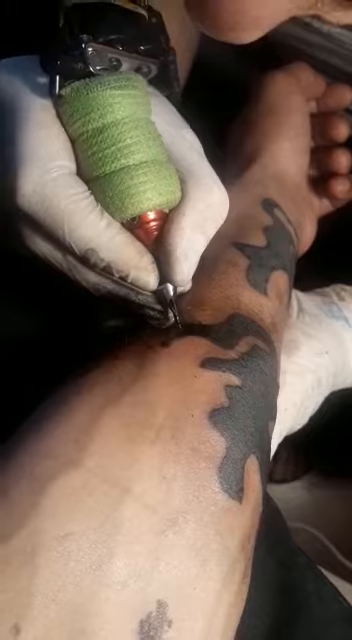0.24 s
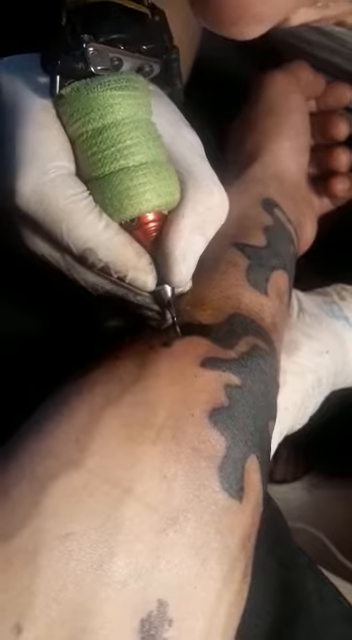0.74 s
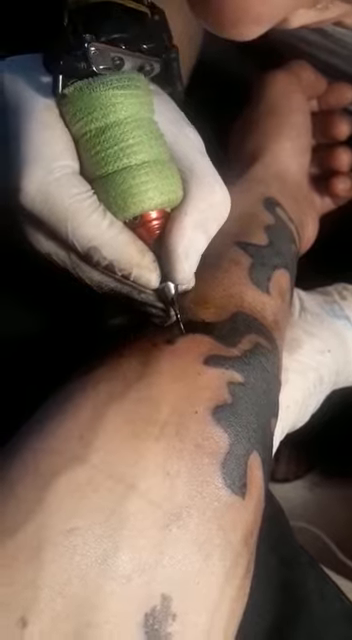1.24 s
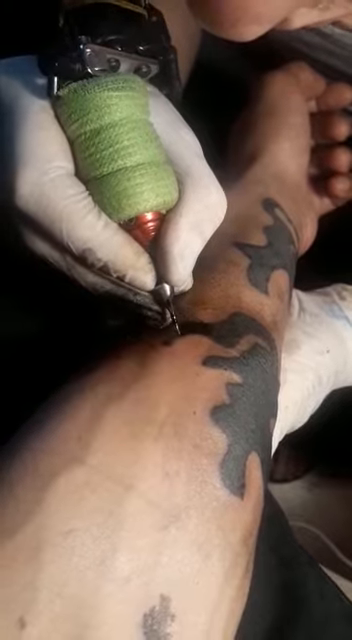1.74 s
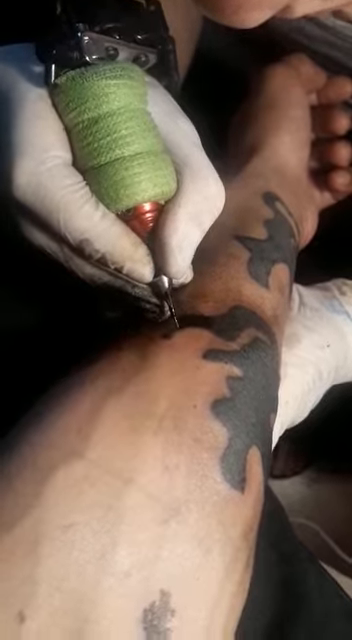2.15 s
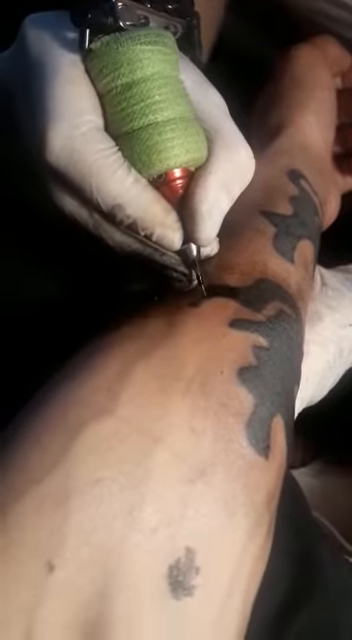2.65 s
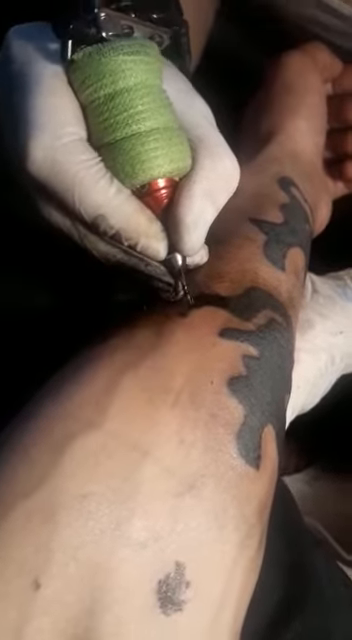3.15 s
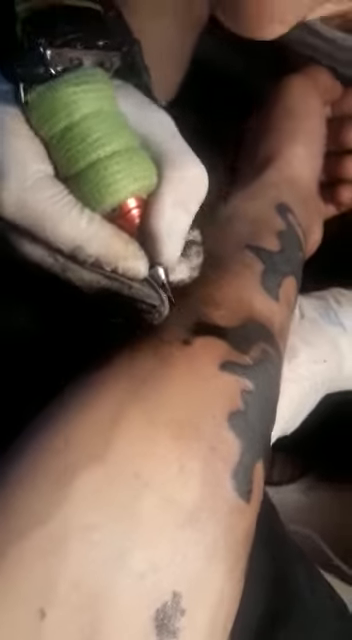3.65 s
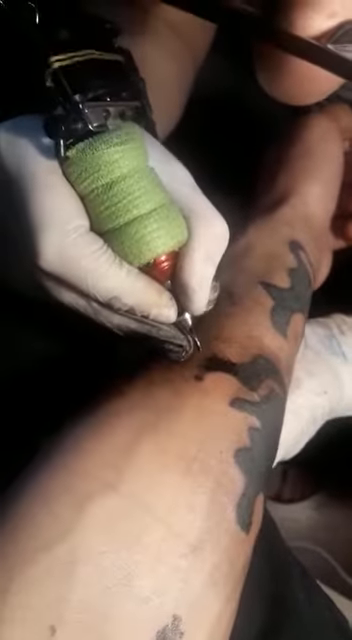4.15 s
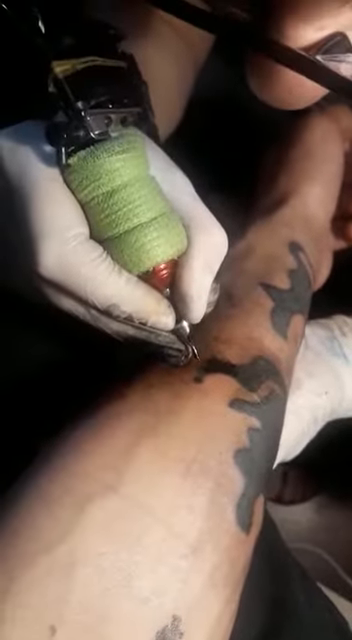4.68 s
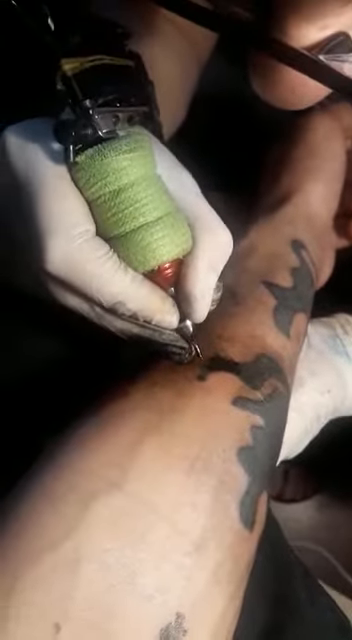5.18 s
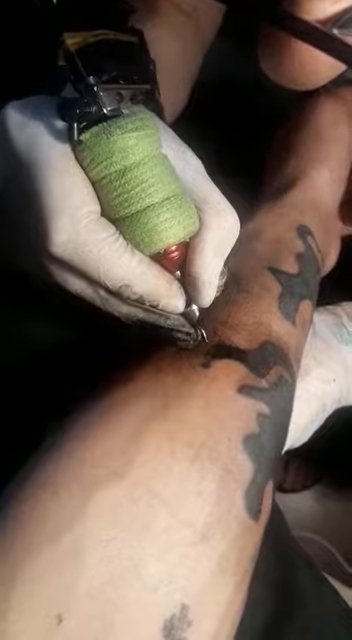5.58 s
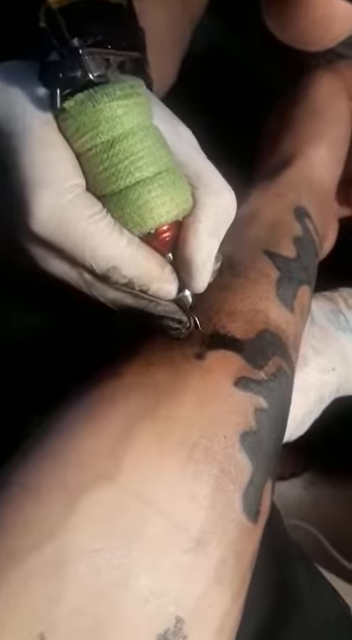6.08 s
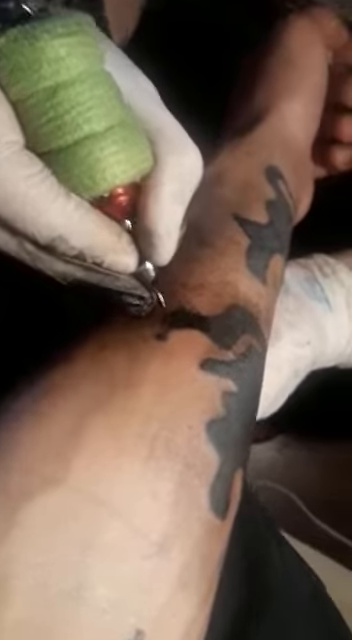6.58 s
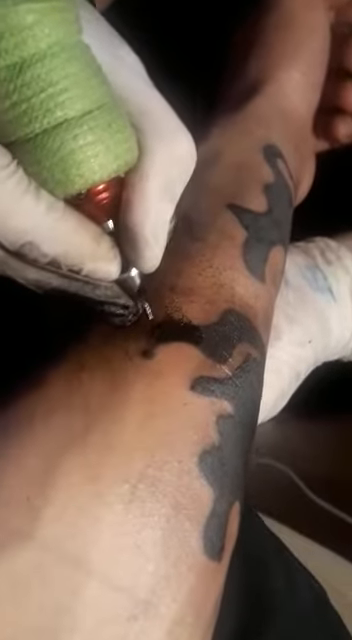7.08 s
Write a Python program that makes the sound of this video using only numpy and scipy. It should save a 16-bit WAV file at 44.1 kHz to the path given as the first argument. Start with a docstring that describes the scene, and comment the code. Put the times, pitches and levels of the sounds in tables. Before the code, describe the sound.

A tattoo machine blips, then buzzes hard and close in two long runs with a short pause between them.

```python
"""A close, hard buzz: a coil tattoo machine blips, then runs twice for about 3 s in a small room.
About 105 times a second the armature knocks the frame; tube, spring, needle bar and yoke ring
with it and the contact sizzles. The colour shifts with the hand's grip and position, and the
buzz rasps when skin drags on the needle. Two short pauses bare the room's tail, rumble and hum."""
import sys
import numpy as np
from scipy import signal
from scipy.fft import rfft, irfft
from scipy.io import wavfile
from scipy.ndimage import uniform_filter1d

SR = 44100
rng = np.random.default_rng(int(sys.argv[2]) if len(sys.argv) > 2 else 0)


def wav_record(signal):
    """Record a signal, one row per channel, as 16-bit PCM in the file named by sys.argv[1]."""
    frames = np.transpose(np.atleast_2d(signal))
    bounded = np.clip(frames, -1, 1)
    # unit amplitude maps onto the largest positive 16-bit level
    quanta = np.round(bounded * 32767).astype(np.int16)
    wavfile.write(sys.argv[1], SR, quanta)


N = 322812
T = np.arange(N) / SR


def gain_of(db):
    return 10 ** (np.asarray(db) / 20)


def rms(x):
    return np.sqrt(np.mean(x ** 2) + 1e-20)


def log_interp(points, hz):
    """Curve value at hz, on a log frequency axis."""
    point_hz, values = np.transpose(points)
    return np.interp(np.log(hz + 1), np.log(point_hz + 1), values)


def drift(top_hz):
    """Slow random wander, about unit RMS, in the decade below top_hz."""
    rates_hz = np.geomspace(top_hz / 10, top_hz, 18)
    wander = sum(np.sin(2 * np.pi * (hz * T[::100] + rng.random())) for hz in rates_hz)
    return wander.repeat(100)[:N] / 3


# Rumble spectrum: f/Hz, relative density/dB
RUMBLE_SPECTRUM = [(20, -36), (35, -10), (50, -4), (80, 2), (120, -0.5), (170, -4), (280, 2), (450, -4.5),
                   (750, -3), (1100, -9.5), (2000, -23), (2800, -28.5), (6000, -45.5), (12000, -46)]
def room_rumble(level_db=-47, swell_db=1.0):
    """Low room noise, swelling slightly."""
    shape = gain_of(log_interp(RUMBLE_SPECTRUM, np.fft.rfftfreq(N, 1 / SR)))
    noise = irfft(rfft(rng.standard_normal(N)) * shape, N)
    return gain_of(level_db + swell_db * drift(2.5)) * noise / rms(noise)


# Room hum tones: f/Hz, level/dB
HUM_TONES = [(78, -63), (152, -54.5), (199.5, -54.5)]
def room_hum(waver_db=0.4, waver_rad=0.72):
    """Low tones wavering in level and phase."""
    out = np.zeros(N)
    for hz, db in HUM_TONES:
        peak = np.sqrt(2) * gain_of(db + waver_db * drift(1.8))
        out += peak * np.sin(2 * np.pi * hz * T + waver_rad * drift(6.9))
    return out


# Soft bumps: a faint click as the armature pulls in or the switch is pressed before each run, and a handling
# knock near the end: t/s, f/Hz, level/dB, decay/s
SOFT_BUMPS = [(0.399, 2010, -51, 0.016), (4.21, 2390, -58, 0.019), (6.605, 348, -34.5, 0.0096)]
def soft_bumps():
    """Each bump is a soft puff of octave-wide noise."""
    out = np.zeros(N)
    for at_s, hz, db, decay_s in SOFT_BUMPS:
        octave = signal.butter(2, [hz / np.sqrt(2), hz * np.sqrt(2)], "band", fs=SR)
        noise = signal.lfilter(*octave, rng.standard_normal(N))
        age = 2 * np.maximum(T - at_s, 0) / decay_s
        out += gain_of(db) * noise / rms(noise) * age * np.exp(1 - age)
    return out


# Room decay: f/Hz, T60/s
ROOM_DECAY = [(300, 1), (1300, 0.36), (3500, 0.39), (5000, 0.43), (9000, 0.2), (15000, 0.25)]
def room(x, wet_db, first_s=0.003, sway_rad=0.44, sway_hz=2):
    """Dense reflections, each band dying at its own rate; two sets blend as the machine sways."""
    t = T[:SR // 2]
    taps = rng.standard_normal((2, len(t))) * (rng.random((2, len(t))) < 0.1) * (t > first_s)
    hz, age_s, spectra = signal.stft(taps, SR, nperseg=256)
    decay = gain_of(-60 * age_s / log_interp(ROOM_DECAY, hz)[:, None])
    tails = signal.istft(spectra * decay, SR, nperseg=256)[1]
    wet_a, wet_b = (signal.oaconvolve(x, tail)[:N] for tail in tails)
    angle = sway_rad * drift(sway_hz)
    wet = np.cos(angle) * wet_a + np.sin(angle) * wet_b
    out = x + gain_of(wet_db) * wet * rms(x) / rms(wet)
    return out * rms(x) / rms(out)


# Coil harmonics: multiple of stroke rate, level/dB
COIL_HARMONICS = [(3, -58), (4, -59.5), (5, -55), (7, -52), (8, -49), (9, -53), (11, -60.5)]
def coil_hum(rate_hz):
    """The coils hum in step with the strokes while the foot switch is down."""
    cycles = np.cumsum(rate_hz) / SR
    out = np.zeros(N)
    for start_s, stop_s, _ in SWITCH_PRESSES:
        gate = uniform_filter1d(1.0 * (T > start_s) * (T < stop_s), size=900)
        phase = 2 * np.pi * (cycles - np.interp(start_s, T, cycles))
        out += gate * sum(np.sqrt(2) * gain_of(db) * np.sin(k * phase) for k, db in COIL_HARMONICS)
    return out


# Stroke rate, one list per long run: t/s, f/Hz
RATE_CURVES = [
    [(0.45, 105.4), (1.07, 105.1), (1.46, 105.3), (3.39, 104.8), (3.66, 105.5)],
    [(4.28, 105.5), (4.99, 105.4), (5.06, 105.1), (5.89, 104.8), (7.3, 104.7)],
]
def stroke_rate(waver_hz=0.092):
    """The rate sags as the needle works the skin and wavers under hand pressure."""
    return np.interp(T, *np.vstack(RATE_CURVES).T) + waver_hz * drift(9)


# Foot switch: start/s, stop/s, first swing/full swing
SWITCH_PRESSES = [(0.0, 0.118, 1), (0.4175, 3.6898, .45), (4.2263, 7.32, 0.3)]
def armature_strokes(rate_hz, run_up_s=0.0062):
    """Time and strength of each stroke; the swing builds over the first few."""
    cycles = np.cumsum(rate_hz) / SR
    unit_power = np.sqrt(SR / rate_hz.mean())
    runs = []
    for start_s, stop_s, first_swing in SWITCH_PRESSES:
        stroke_cycles = np.arange(*np.interp([start_s, stop_s], T, cycles))
        stroke_s = np.interp(stroke_cycles, cycles, T)
        swing = 1 - (1 - first_swing) * np.exp(-(stroke_s - start_s) / run_up_s)
        runs.append([stroke_s, swing * unit_power])
    return np.hstack(runs)


# Ring levels under the grip, one list per long run: t/s, frame/dB, tube/dB, spring/dB
GRIP_LEVELS = [
    [(0.47, -27.5, -33.5, -27), (0.72, -27.5, -33.5, -26), (2.18, -27.5, -34, -25.5),
     (2.61, -27.5, -29, -30), (2.76, -28, -31, -28), (3.37, -28.5, -36.5, -33), (3.53, -26.5, -32, -28),
     (3.66, -27, -32.5, -28)],
    [(4.28, -29.5, -31.5, -35), (4.35, -27.5, -32, -37), (5.24, -30, -31, -33), (5.43, -30, -31.5, -36.5),
     (5.92, -30.5, -31.5, -27), (6.72, -26.5, -32, -27), (6.95, -26, -31, -29.5), (7.3, -27.5, -30, -31)],
]
# Finger squeezes damping tube and spring: t/s, depth/dB
FINGER_SQUEEZES = [(1.15, 3), (2.921, 1.5)]
def grip_levels(stroke_s, squeeze_s=0.029, tremor_db=0.36, tremor_hz=4.5):
    """Drive in dB per part and stroke, set by a slightly trembling grip."""
    times_s, *curves_db = np.vstack(GRIP_LEVELS).T
    frame, tube, spring = (np.interp(stroke_s, times_s, db) for db in curves_db)
    squeeze = sum(db * np.exp(-((stroke_s - at_s) / squeeze_s) ** 2) for at_s, db in FINGER_SQUEEZES)
    levels_db = dict(
        frame=frame,
        yoke=-32.5 + 0.51 * (frame - frame.mean()),  # bolted to the frame
        tube=tube - squeeze,
        spring=spring - squeeze,
        bar=-39 - 0.18 * (spring - spring.mean()),  # takes up what a damped spring loses
        contact=-32.5 + 0.1 * (spring - spring.mean()))  # sits on the spring
    return {part: db + tremor_db * np.interp(stroke_s, T, drift(tremor_hz))
            for part, db in levels_db.items()}


# Needle catches: t/s, half length/s, extra drag/dB
NEEDLE_CATCHES = [(.44, .03, 11), (.85, .025, 10), (2.97, .04, 7), (3.46, .05, 11), (4.25, .03, 11),
                  (6.3, .03, 13), (6.55, .025, 8), (6.81, .035, 13)]
def skin_drag(wander_db=3.5, wander_hz=11):
    """Drag in dB: uneven, leaping when the needle catches."""
    catches_db = sum(db * np.exp(-((T - at_s) / half_s) ** 2) for at_s, half_s, db in NEEDLE_CATCHES)
    return wander_db * drift(wander_hz) + catches_db


def knocks(stroke_s, force, lag_ms, uneven_db, jitter_ms=0.002):
    """One band-limited impulse per stroke, slightly off in time and force."""
    time_error, force_error = rng.standard_normal((len(stroke_s), 2)).T
    centre = (stroke_s + (lag_ms + jitter_ms * time_error) / 1000) * SR
    taps = np.round(centre).astype(int)[:, None] + np.arange(-12, 13)
    offset = taps - centre[:, None]
    pulses = np.sinc(offset) * np.cos(np.pi * offset / 26) ** 2
    pulses *= (force * gain_of(uneven_db * force_error))[:, None]
    return np.bincount(taps[taps >= 0], pulses[taps >= 0], N)[:N]


def rattle(x, drag_db, noise_db, fade_ms):
    """Loose metal adds a noise puff to each knock, more as drag rises."""
    age = T[:1500] * 1000 / fade_ms
    puff = age * np.exp(-age)
    envelope = np.sqrt(abs(signal.oaconvolve(x ** 2, puff / puff.sum())[:N]))
    noise = gain_of(noise_db + 0.75 * drag_db) * envelope * rng.standard_normal(N)
    return (x + noise) / np.hypot(1, gain_of(noise_db))


def resonance(modes, hz):
    """Minimum-phase response of a part with these modes."""
    power = sum(gain_of(db) ** 2 / (1 + (2 * (abs(hz) - mode_hz) / width_hz) ** 2) ** 2
                for mode_hz, width_hz, db in modes)
    return np.exp(np.conj(signal.hilbert(np.log(power + 1e-10) / 2)))


# Hand positions: start/s, tube pitch ratio, glove delay/ms, glove gain, arm delay/ms, arm gain
HAND_POSES = [(0, .965, 0.41, -0.175, 1.43, 0.079), (.7, 0.94, 0.67, 0.22, 1.407, 0.072),
              (2.3, 1.03, 1.49, 0.26, 2.8, -0.195), (2.88, 0.98, 1.46, 0.24, 3.6, -0.029),
              (3.49, .98, 0.38, -0.02, 1.52, 0.08), (4.0, 0.99, 0.46, 0.15, 2.853, -.32),
              (5.04, 1.037, 0.405, 0.14, 1.79, -0.093), (5.92, 1.06, 0.48, 0.1, 1, 0.1),
              (6.64, 1.0094, 0.4, -0.17, 1.88, 0.13)]
def radiate(x, modes, gripped=False, move_s=0.06):
    """A part rings and echoes off glove and arm; the fingers retune it if gripped. Poses crossfade."""
    hz = np.fft.fftfreq(2048, 1 / SR)
    out = np.zeros(N + len(hz))
    fades = [np.clip((T - pose[0]) / move_s + 0.5, 0, 1) for pose in HAND_POSES[1:]]
    reached = [np.ones(N), *fades, np.zeros(N)]
    for k, (_, pitch, *paths) in enumerate(HAND_POSES):
        echoes = sum(g * np.exp(-2j * np.pi * hz * ms / 1000) for ms, g in np.reshape(paths, (-1, 2)))
        ring = np.fft.ifft(resonance(modes, hz / pitch if gripped else hz) * (1 + echoes)).real
        share = reached[k] - reached[k + 1]
        held = np.flatnonzero(share)
        sound = signal.oaconvolve(x[held] * share[held], ring / np.linalg.norm(ring))
        out[held[0]:held[0] + len(sound)] += sound
    return out[:N]


# Lingering steel modes: f/Hz, T60/s, level/dB re input
STEEL_MODES = [(4740, .26, -31), (4850, .2, -29)]
def steel_ring(x):
    """Steel rings on faintly after the strokes."""
    t = T[:SR // 2]
    out = np.zeros(N)
    for hz, t60_s, db in STEEL_MODES:
        ring = signal.oaconvolve(x, np.sin(2 * np.pi * hz * t) * gain_of(-60 * t / t60_s))[:N]
        out += ring * gain_of(db) * rms(x) / rms(ring)
    return out


# Resonances of each part: f/Hz, width/Hz, relative level/dB
FRAME_MODES = [(2545, 460, -2.5), (2900, 500, -1), (3150, 86, 1.5)]
YOKE_MODES = [(623, 580, -31.5), (932, 142, -17), (1311.6, 86, -1.5), (1670, 485, -12), (1888, 152, -1),
              (2176, 146, -3.5)]
TUBE_MODES = [(3966, 690, -2), (4387, 158, -1.6)]
SPRING_MODES = [(4716, 240, 0), (4804, 440, 0.5)]
BAR_MODES = [(5550, 1500, -0.5), (7024, 1700, -8.5), (8600, 3100, -13)]
CONTACT_MODES = [(10920, 630, -11.5), (13230, 1030, 3.5), (13600, 3400, -4.5), (15860, 1250, 4.5)]
def tattoo_machine(rate_hz, base_slip_s=3.6e-6):
    """Each stroke knocks six parts in quick succession; drag makes the timing slip and the metal rasp."""
    stroke_s, swing = armature_strokes(rate_hz)
    force = {part: swing * gain_of(db) for part, db in grip_levels(stroke_s).items()}
    for part in ("bar", "contact"):  # these chatter mainly at wide swing
        force[part] *= swing / swing.max()
    drag_db = skin_drag()
    slip_s = base_slip_s * gain_of(np.interp(stroke_s, T, drag_db))
    hit_s = stroke_s + slip_s * rng.standard_normal(len(stroke_s))

    frame = knocks(hit_s, force["frame"], lag_ms=0, uneven_db=0.4221)
    frame = rattle(frame, drag_db, noise_db=-26.5, fade_ms=1.5)
    yoke = knocks(hit_s, force["yoke"], lag_ms=1.15, uneven_db=0.17)
    yoke = rattle(yoke, drag_db, noise_db=-26, fade_ms=2.9)
    tube = knocks(hit_s, force["tube"], lag_ms=0.23, uneven_db=0.8)
    tube = rattle(tube, drag_db, noise_db=-23, fade_ms=2)
    spring = knocks(hit_s, force["spring"], lag_ms=0.636, uneven_db=0.5, jitter_ms=0.0018)
    spring = rattle(spring, drag_db, noise_db=-31.5, fade_ms=1.1)
    # chatter: a lighter touch, then the full blow
    bar = knocks(hit_s, 0.19 * force["bar"], lag_ms=-0.297, uneven_db=3)
    bar += knocks(hit_s, 1.207 * force["bar"], lag_ms=0.804, uneven_db=0.1)
    contact = knocks(hit_s, 0.626 * force["contact"], lag_ms=-0.197, uneven_db=0.5)
    contact += knocks(hit_s, 0.86 * force["contact"], lag_ms=1.05, uneven_db=0.5, jitter_ms=0.0022)
    bar = rattle(bar, drag_db, noise_db=-19.5, fade_ms=0.26)
    contact = rattle(contact, drag_db, noise_db=-11.5, fade_ms=1)

    drone = gain_of(0.42) * radiate(yoke, YOKE_MODES)
    buzz = gain_of(0.3) * radiate(frame, FRAME_MODES)
    buzz += gain_of(1.0) * radiate(tube, TUBE_MODES, gripped=True)
    buzz += gain_of(0.67) * radiate(spring, SPRING_MODES) + steel_ring(spring)
    fizz = gain_of(1.0) * radiate(bar, BAR_MODES)
    sizzle = gain_of(1.46) * radiate(contact, CONTACT_MODES)
    return room(drone, wet_db=-7) + room(buzz, wet_db=-8) + room(fizz, wet_db=2) + room(sizzle, wet_db=4)


def scene():
    rate_hz = stroke_rate()
    return (tattoo_machine(rate_hz) + coil_hum(rate_hz) + soft_bumps() + room_rumble() + room_hum())[None]


def record(dry):
    """Low cut at 25 Hz, steep band limit at 15.83 kHz."""
    thinned = signal.lfilter(*signal.butter(2, 25, "high", fs=SR), dry)
    lowpass = signal.firwin(701, 15830, window=("kaiser", 9), fs=SR)
    return signal.oaconvolve(thinned, lowpass[None], "same")


dry = scene()
out = record(dry)
wav_record(out)
```